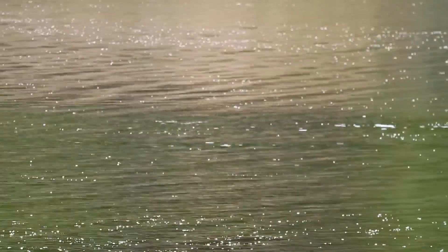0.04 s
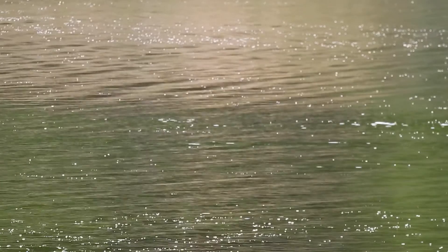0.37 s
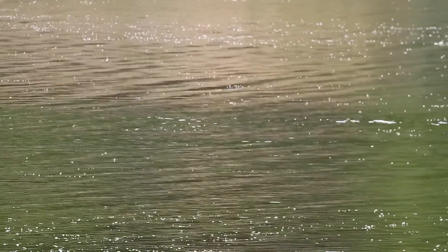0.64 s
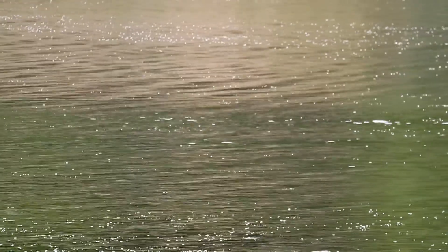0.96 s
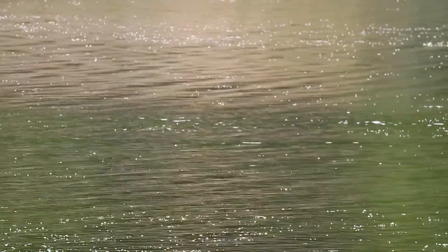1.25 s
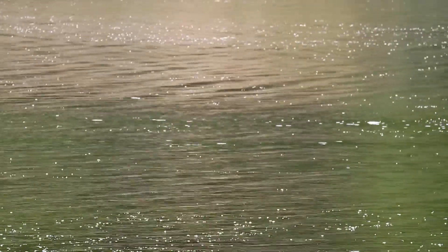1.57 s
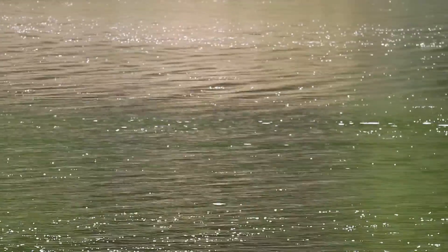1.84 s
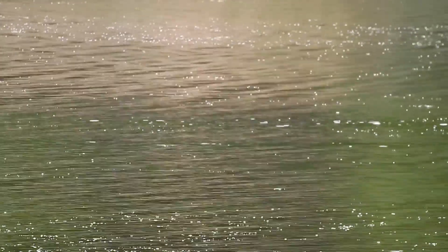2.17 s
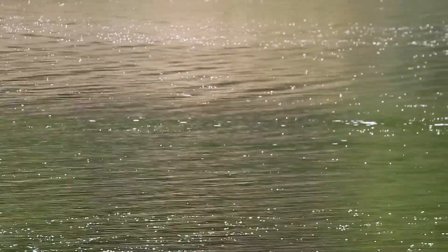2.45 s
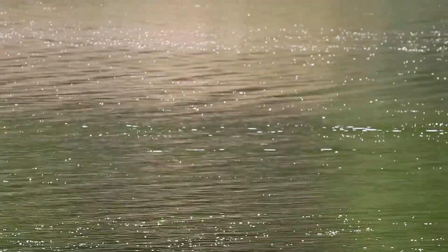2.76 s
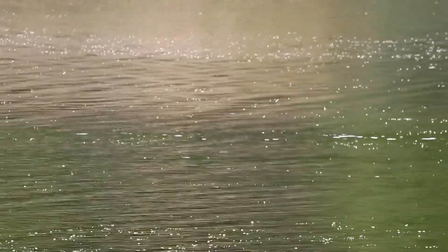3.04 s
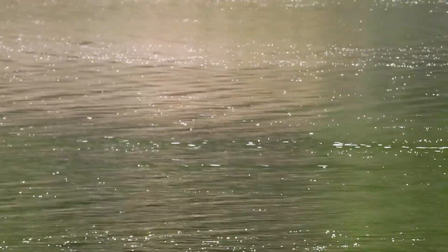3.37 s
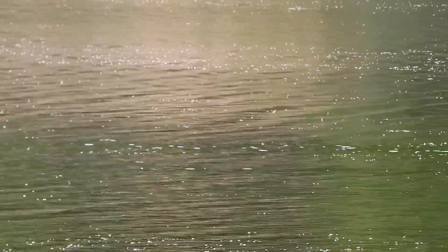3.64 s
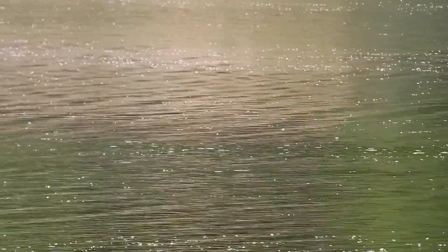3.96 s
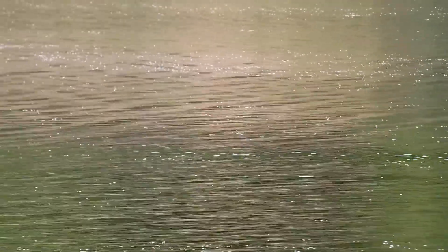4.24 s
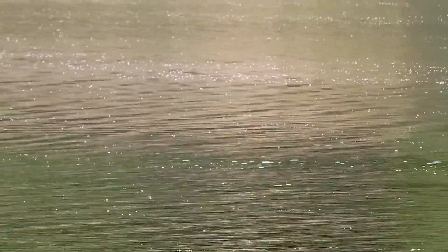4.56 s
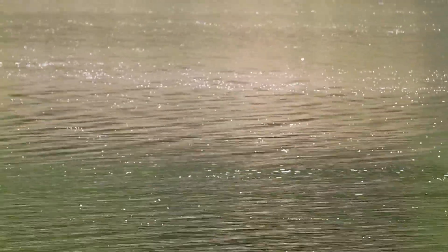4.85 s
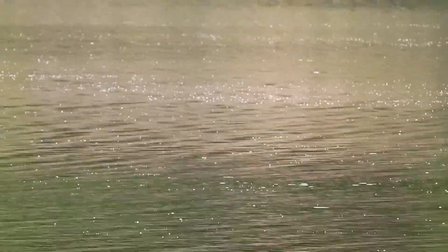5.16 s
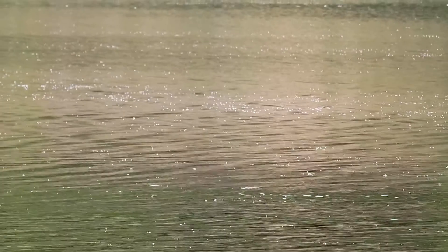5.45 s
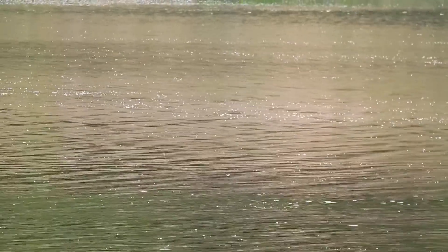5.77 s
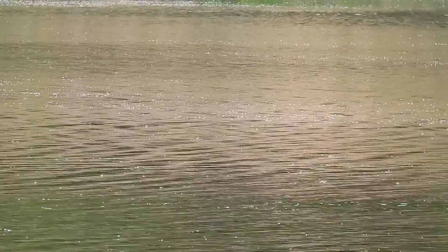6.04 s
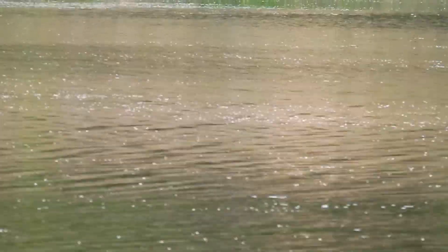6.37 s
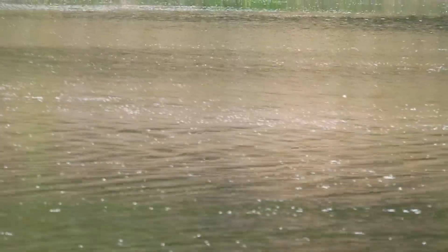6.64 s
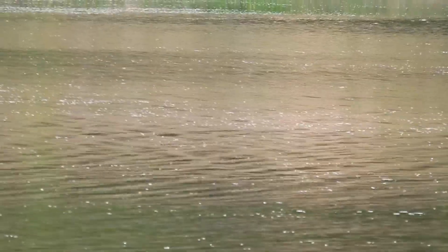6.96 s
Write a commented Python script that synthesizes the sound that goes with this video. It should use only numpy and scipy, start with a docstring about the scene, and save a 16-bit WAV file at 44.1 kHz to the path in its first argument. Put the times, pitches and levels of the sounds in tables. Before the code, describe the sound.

A small bird gives short, high chirps again and again beside a river, while a second whistles faintly farther off. Low wind buffeting on the microphone is the loudest sound at first, with a few light ticks, and it fades about halfway through. Underneath, a far engine hums and throbs steadily, the water flows with a gentle wash that slowly grows, and crickets trill faintly. There is a light echo from the trees.

```python
"""Wind thumps and rumbles on the two microphone ports, each on its own, for about three seconds.
Through it and after it, a small bird repeats arched, slurred chirps that echo in the trees
on a river bank; a second bird whistles farther off. The river washes along with tiny ringing
bubbles, a far motor drones and throbs as it fires, and crickets trill with their wings."""
import sys
import numpy as np
from scipy import signal
from scipy.fft import rfft, irfft
from scipy.io import wavfile
from scipy.ndimage import uniform_filter1d

SR = 44100
rng = np.random.default_rng(int(sys.argv[2]) if len(sys.argv) > 2 else 0)


def digitize_waveform(pressure):
    """Quantize a signal to 16-bit integers and store it at the path in sys.argv[1].

    Rows of a 2-D input are taken as channels; values are limited to [-1, 1].
    """
    field = np.atleast_2d(pressure).T
    bounded = np.clip(field, -1, 1)
    quanta = np.round(bounded * 32767).astype(np.int16)
    wavfile.write(sys.argv[1], SR, quanta)


N = 313110
TIME = np.arange(N) / SR
HZ = np.fft.rfftfreq(N, 1 / SR)

# Levels in the tables are relative: the functions add their own gains.
# The bird's notes, a high arch often followed by a lower note: t/s, length/s, time to crest/s,
# first f/Hz, crest f/Hz, last f/Hz, hold (1 slides evenly, 3 stays up and then drops),
# crest level/dB, change by the end/dB, rasp (share of the pitch)
BIRD_NOTES = [ (0, 0.1, .01, 3940, 3940, 3370, 1.15, -54, 2, .01),
              (.772, 0.067, .016, 4620, 5070, 4340, 1.05, -39, -7, 0.016),
              (.915, 0.1, 0.011, 4000, 4050, 3700, 1.3, -53, -1, .045),
              (1.512, 0.059, .021, 4960, 5300, 4480, 1.65, -45, 6, .04),
              (1.57, 0.036, 0.016, 4430, 4520, 4450, 1.5, -42, -1, 0.024),
              (1.645, 0.051, 0.014, 4360, 4580, 3670, 1.3, -42.5, -5, .03),
              (2.187, 0.063, 0.035, 4370, 5450, 4800, 2.5, -42, -3, 0.03),
              (2.247, 0.07, 0.0055, 4700, 4680, 3980, 1, -47, 2, 0.044),
              (2.326, 0.032, .007, 4500, 4740, 4280, 1.2, -44.5, -2, 0.029),
              (2.857, 0.069, .043, 4330, 5220, 4850, 2.2, -44.5, -7, 0.032),
              (3.003, 0.021, .011, 4370, 4540, 4280, 1.5, -38, -10, .03),
              (3.502, 0.093, 0.048, 4250, 5430, 3930, 2.63, -42.5, 1, 0.039),
              (3.647, .066, 0.0057, 4700, 4940, 4310, 1.3, -46, -6, 0.043),
              (4.168, 0.12, 0.032, 4560, 5160, 4970, 2.1, -45, -4, 0.041),
              (4.348, 0.043, .008, 4500, 4540, 3900, 1.7, -47, -2, .04),
              (4.783, .058, .03, 4500, 5240, 5230, 2, -49, -1, .035),
              (4.837, 0.15, .012, 5100, 5170, 4920, 1.6, -42, -4, 0.017),
              (5.323, .18, .04, 4700, 5420, 5070, 1.33, -48, 0, .022),
              (5.505, 0.11, 0.0056, 3880, 3870, 3300, 0.42, -50, -2, 0.026),
              (5.952, .108, 0.029, 4630, 5160, 4260, 2.6, -44, -13, .04),
              (6.051, .112, .035, 4350, 4340, 3830, 3.4, -43.5, -6, 0.0087),
              (6.674, .1, 0.048, 4330, 5280, 4030, 2.1, -42.5, -2, .028),
              (6.779, 0.095, 0.0069, 4100, 4000, 3740, 2.5, -46.5, 8, 0.0085)]
# The farther bird's sliding notes: t/s, length/s, first f/Hz, last f/Hz, level/dB
FAR_BIRD_NOTES = [(.06, 0.059, 5700, 5500, -60), (1.615, .03, 6050, 6050, -55),
                  (2.08, 0.023, 5400, 5350, -51), (2.265, 0.065, 6650, 6200, -54),
                  (4.575, .025, 5300, 5450, -48)]
# How squarely the bird faces us: t/s, boost of direct over scattered sound/dB
BIRD_FACING = [(0, -3.5), (1.6, -1), (3.1, 1), (4.3, 0), (5.4, 3), (6.1, 1), (6.8, 1)]
# Echoes from the bank and trunks: delay/s, level/dB, pan (-1 left, 1 right)
BANK_ECHOES = [(.005, -20.5, -0.21), (0.012, -15.5, 0.5), (.034, -16, -0.22)]
# Gusts on the microphone: t/s, length/s, left level/dB, right level/dB
WIND_GUSTS = [(0.061, 0.071, -25.5, -18.5), (.16, .07, -27, -21.5), (.255, 0.095, -29, -13.5),
              (0.367, 0.058, -30, -20.5), (.69, 0.017, -29, -42), (0.813, 0.045, -33, -23.5),
              (1.087, 0.015, -35, -19.5), (1.43, 0.23, -34, -30), (1.873, .11, -26.5, -34),
              (2.06, 0.13, -22, -39), (2.335, 0.07, -16.5, -38), (2.488, 0.19, -15, -33),
              (2.719, 0.036, -19, -21), (2.827, .03, -24.5, -36), (3.204, 0.024, -38, -30.5),
              (3.666, 0.013, -30, -44)]
# The tone of wind on the ports: f/Hz, level/dB
WIND_SPECTRUM = [(10, -38), (25, -33), (45, -2.5), (70, 2.5), (115, 8.5), (175, -1.5), (230, -13),
                 (330, -27), (500, -43), (900, -47), (4000, -110)]
# Light air between the gusts: t/s, level/dB
BREEZE_LEVEL = [(0, -34), (.6, -36), (2.2, -35), (3.5, -38.5), (4.4, -52.5), (7.1, -62)]
# Eddies (swirls of air) breaking on a port: t/s, level/dB, f/Hz, port (0 left, 1 right)
EDDY_THUMPS = [(0.1, -13, 247, 1), (0.198, -6.5, 158, 1), (0.279, -6, 129, 1), (0.4, -11.5, 193, 1),
               (0.817, -10, 126, 1), (.858, -12.5, 149, 1), (1.099, -18, 219, 1), (2.305, -9.5, 198, 0),
               (2.344, -4, 161, 0), (2.473, -5, 100, 0), (2.572, -4.5, 153, 0), (2.664, -12, 261, 0),
               (2.838, -11.5, 141, 0)]
# The tone of the river's wash: f/Hz, level/dB
RIVER_SPECTRUM = [(100, 6), (350, 4), (520, 2), (680, 3), (900, 1.5), (1500, 0), (2100, -2.5), (3300, -2.5),
                  (4500, -2.5), (6400, -0.2), (7300, -3), (7800, -11), (8300, -12), (10000, -20.5),
                  (13000, -29)]
# Small waves at the bank: t/s, level/dB, half length/s, centre f/Hz, width/Hz
WAVE_LAPS = [(1.25, -55.5, 0.19, 503, 70.5), (3.446, -55, 0.086, 1520, 60), (6.5, -58, 0.041, 1386, 140.3),
             (6.93, -51.5, .12, 1370, 200)]
# The motor's loudness: t/s, level/dB
MOTOR_LEVEL = [(0, -37.5), (3.6, -35.5), (4.7, -36.5), (5.3, -34), (7.1, -32.7)]
# The tone of its dull roar: f/Hz, level/dB
MOTOR_SPECTRUM = [(20, -53), (35, -40), (55, -2), (90, -1), (120, 4.5), (160, -2), (220, -11.5), (300, -17),
                  (400, -17), (520, -20.5), (650, -42.5), (1200, -39), (5000, -100)]
# Its humming tones: multiple of the firing rate, level/dB
MOTOR_HARMONICS = [(4, 0.5), (5, 1), (6, -4.5), (8, -14.5), (11, -13), (12, -30.5), (15, -17.5), (16, -23)]
# Its hollow note: t/s, centre f/Hz, level/dB
MOTOR_HOLLOW = [(0, 361, -55.5), (1.3, 361, -53.5), (2.5, 365, -48), (3.5, 368, -51), (4.9, 370, -48.5),
                (5.1, 368, -58), (6, 348, -49.5), (7.1, 343, -53)]
# The whole cricket chorus: t/s, middle f/Hz, level/dB
CHORUS_TRILL = [(0, 7625, -49.5), (1.6, 7600, -50), (2.1, 7750, -51.5), (3.2, 7620, -47.5),
                (4.4, 7610, -50), (7.1, 7600, -49)]
# Single crickets: pitch offset/Hz, level/dB, wing stroke rate/Hz
CRICKET_VOICES = [(-115, -2, 52), (-45.5, -4.5, 80), (11.5, -3.5, 75), (69, -1.5, 56), (125, -12, 55)]
# Ticks and drips nearby: t/s, level/dB, centre f/Hz, width/octaves, decay/s
NEAR_TICKS = [(.281, -52, 12000, .4, .0022), (1.062, -46.5, 7800, .067, .012), (1.616, -49, 7000, .6, .002),
              (1.93, -36, 2400, 0.75, .0043), (1.948, -41, 6500, 0.28, .0068),
              (2.129, -40, 6800, .25, .0044), (2.555, -43, 6200, .1, 0.0061), (2.777, -44, 6240, .2, .003),
              (6.89, -45, 7840, .08, .012)]
# How alike far noise is in both ears: f/Hz, likeness (0 unrelated, 1 the same)
EAR_LIKENESS = [(60, 0.94), (140, 1), (350, 0.88), (800, 0.82), (2000, 0.66), (3500, 0.75), (5000, 0.47),
                (6500, 0.29), (8500, 0.0022), (15000, 0.14)]


def birds(direct_db=-3.5, leaves_db=-8, grove_db=-5, grove_hz=4900, lingering_db=-51):
    """Both birds and their echoes: near branches blur the notes, and the grove rings with high ones."""
    song = np.zeros(N)
    for start, *note in BIRD_NOTES:
        add(song, start, chirp(*note))
    for start, length, first_hz, last_hz, db in FAR_BIRD_NOTES:
        add(song, start, whistle(np.linspace(first_hz, last_hz, round(length * SR)), db, rasp=0.015))
    facing = gain_of(follow(BIRD_FACING)[0] / 2)
    direct, aside = song * facing, song / facing
    out = gain_of(direct_db) * np.array([direct, direct])
    for delay, db, pan in BANK_ECHOES:
        add(out[0], delay, gain_of(db) * (1 - pan) * aside)
        add(out[1], delay, gain_of(db) * (1 + pan) * aside)
    out += gain_of(leaves_db) * tree_echo(aside, fade_s=0.2, build_s=0.004)
    # a chirp is already ringing in the trees at the start
    out += gain_of(lingering_db - 60 * TIME / 0.9) * narrow_noise(4180, width_hz=99)
    high_notes = signal.lfilter(*signal.iirpeak(grove_hz, Q=5, fs=SR), aside)
    return out + gain_of(grove_db) * tree_echo(high_notes, fade_s=0.77, build_s=0.045)


def chirp(length, crest_s, first_hz, crest_hz, last_hz, hold, db, fade_db, rasp, scoop_db=-3):
    """One arch: the pitch scoops up to its crest, holds and slides down."""
    t = np.arange(0, length, 1 / SR)
    scoop = np.clip(1 - t / crest_s, 0, 1) ** 2
    fall = np.clip((t - crest_s) / (length - crest_s), 0, 1) ** hold
    hz = crest_hz + (first_hz - crest_hz) * scoop + (last_hz - crest_hz) * fall
    level = db + scoop_db * scoop + fade_db * fall
    # on high notes the other side of the bird's voice box joins in, lower and weaker, adding a burr
    joined = np.interp(hz, [4100, 4900], [0, 1])
    return whistle(hz, level, rasp) + joined * whistle(hz - 300, level - 6, rasp)


def whistle(hz, db, rasp, tremble_db=3.6, attack_s=0.006, release_s=0.005):
    """A nearly pure tone along the pitch curve hz; quick pitch dips and a tremble make it rasp."""
    t = np.arange(len(hz)) / SR
    steps = t[::110]
    quiver = np.interp(t, steps, rng.standard_normal(len(steps)))
    tremble = np.interp(t, steps, rng.standard_normal(len(steps)))
    tone = np.sin(phase_of(hz * (1 + rasp * np.minimum(quiver, 0))))
    edges = np.clip(np.minimum(t / attack_s, (t[-1] - t) / release_s), 0, 1)
    return np.sqrt(2) * gain_of(db + tremble_db * tremble) * tone * edges


def wind(rise_s=0.022, fall_s=0.028, eddy_db=1.86, eddy_rate_hz=7.8, breeze_cutoff_hz=150):
    """Gusts shake each port with its own eddies; light air makes only the deepest rumble."""
    t = TIME[::64]
    power = np.zeros((2, len(t)))
    for start, length, left_db, right_db in WIND_GUSTS:
        # a gust builds up just before its start and dies away after its length
        outside = np.maximum(start - t, 0) / rise_s + np.maximum(t - start - length, 0) / fall_s
        power += (gain_of([[left_db], [right_db]]) * np.exp(-np.minimum(outside, 20))) ** 2
    colour = gain_of(at_frequency(WIND_SPECTRUM, HZ))
    ports = []
    for force in np.sqrt(power):
        swirl = shaped_noise(colour)
        # even out the noise so that gusts and eddies set its strength
        swirl /= np.sqrt(uniform_filter1d(swirl ** 2, size=1300) + 0.016)
        breeze = shaped_noise(colour / (1 + (HZ / breeze_cutoff_hz) ** 2))
        strength = gain_of(eddy_db * wander(eddy_rate_hz)) * np.interp(TIME, t, force)
        ports.append(strength * swirl + gain_of(follow(BREEZE_LEVEL)[0]) * breeze)
    return np.array(ports)


def thumps(level_db=-2, width_cycles=0.52):
    """A breaking eddy shoves the microphone's membrane once, and it swings straight back."""
    out, t = np.zeros((2, N)), np.arange(-700, 700) / SR
    for when, db, hz, port in EDDY_THUMPS:
        push = np.sin(2 * np.pi * hz * t) * np.exp(-(hz * t / width_cycles) ** 2)
        add(out[int(port)], when + t[0], gain_of(db + level_db) * push)
    return out


def river(wash_db=4.5, bubbles_db=-18, spread_db=12, count=600, flow_db=-52.5, growth_db_per_s=0.9551):
    """A slowly swelling wash of far ripples, with small bubbles that rise in pitch as they ring."""
    t, bubbles = np.arange(SR // 25) / SR, np.zeros((2, N))
    for when, smallness, loudness, side in rng.random((count, 4)):
        hz = 700 * 9 ** smallness
        rising_tone = np.sin(2 * np.pi * hz * t * (1 + 2 * t))
        ring = gain_of(spread_db * loudness ** 2) * rising_tone * np.exp(-hz * t / 7)
        add(bubbles[0], when * N / SR, (2 - side) * ring)
        add(bubbles[1], when * N / SR, (1 + side) * ring)
    wash = gain_of(wash_db) * far_noise(RIVER_SPECTRUM, patchy_db=1.62)
    water = wash + gain_of(bubbles_db) * unit_level(bubbles)
    return gain_of(flow_db + growth_db_per_s * TIME) * water


def laps():
    """Small waves gurgle softly against the bank, each swelling and fading."""
    return sum(gain_of(db) * np.exp(-((TIME - when) / half_s) ** 2) * narrow_noise(hz, width_hz)
               for when, db, half_s, hz, width_hz in WAVE_LAPS)


def motor(firing_hz=24.13, waver=0.00832, throb=0.34, hum_db=-5, fading_db=1, left_db=-1.9):
    """A far engine: a roar that throbs with each firing, a wavering hum and a hollow note."""
    firing = phase_of(firing_hz * (1 + waver * wander(2.19)))
    hum = sum(gain_of(db + fading_db * wander(1.4)) * np.cos(multiple * firing + wander(1))
              for multiple, db in MOTOR_HARMONICS)
    roar = far_noise(MOTOR_SPECTRUM, patchy_db=1) * (1 + throb * np.cos(firing))
    drone = gain_of(follow(MOTOR_LEVEL)[0]) * (roar + gain_of(hum_db) * unit_level(hum))
    hollow_hz, hollow_db = follow(MOTOR_HOLLOW)
    hollow = gain_of(hollow_db) * narrow_noise(hollow_hz, width_hz=50)
    return drone * gain_of([[left_db], [0]]) + hollow


def crickets(level_db=-1, drift_hz=29, throb=0.16, throb_hz=11, echo_db=-1):
    """Each cricket's wing strokes ring near one pitch; the chorus throbs and blurs among the trees."""
    middle_hz, db = follow(CHORUS_TRILL)
    chorus = np.zeros(N)
    for offset_hz, own_db, stroke_hz in CRICKET_VOICES:
        strokes = 1 + 0.78 * np.cos(phase_of(stroke_hz * (1 + 0.0595 * wander(7.63))))
        ring = np.sin(phase_of(middle_hz + offset_hz + drift_hz * wander(25.04)))
        chorus += gain_of(own_db) * strokes * ring
    chorus *= 1 + throb * np.sin(phase_of(throb_hz + wander(3.1)))
    echo = gain_of(echo_db) * tree_echo(chorus, fade_s=0.48, build_s=0.0088)
    return gain_of(db + level_db) * unit_level(chorus + echo)


def ticks(level_db=-3, attack_s=0.00027):
    """Ticks and drips: brief bursts of noise, each in its own band, that die at once."""
    out, t = np.zeros(N), np.arange(2048) / SR
    hz = np.fft.rfftfreq(len(t), 1 / SR)
    for start, db, centre_hz, octaves, decay_s in NEAR_TICKS:
        band = np.exp(-0.5 * (np.log2((hz + 1) / centre_hz) / octaves) ** 2)
        envelope = np.exp(-t / decay_s) * (1 - np.exp(-t / attack_s))
        add(out, start, gain_of(db + level_db) * shaped_noise(band, len(t)) * envelope)
    return out


def tree_echo(sound, fade_s, build_s):
    """Trees scatter a sound into a tail, different at each ear, that drops 60 dB in fade_s."""
    t = np.arange(SR) / SR
    tail = rng.standard_normal((2, SR)) * gain_of(-60 * t / fade_s) * (1 - np.exp(-t / build_s))
    return signal.fftconvolve(sound[None], tail / np.linalg.norm(tail[0]), axes=1)[:, :N]


def far_noise(spectrum, patchy_db):
    """Stereo noise from afar, alike in both ears in the bass, with passing brighter patches."""
    hz = np.fft.rfftfreq(2048, 1 / SR)
    mid_re, mid_im, side_re, side_im, patches = rng.standard_normal((5, N // 512 + 5, len(hz)))
    patches = uniform_filter1d(patches, size=7, axis=0)  # smooth over time
    patches = unit_level(uniform_filter1d(patches, size=18, axis=1))  # and over frequency
    likeness = at_frequency(EAR_LIKENESS, hz)
    mid = np.sqrt(1 + likeness) * (mid_re + 1j * mid_im)
    side = np.sqrt(1 - likeness) * (side_re + 1j * side_im)
    colour = gain_of(at_frequency(spectrum, hz) + patchy_db * patches)
    frames = np.array([mid + side, mid - side]) * colour
    _, sound = signal.istft(frames.swapaxes(1, 2), nperseg=2048, noverlap=1536)
    return unit_level(sound[:, :N])


def narrow_noise(hz, width_hz):
    """A narrow band of noise around hz, which may move."""
    phase = phase_of(hz * np.ones(N))
    return wander(width_hz) * np.cos(phase) + wander(width_hz) * np.sin(phase)


def shaped_noise(colour, samples=N):
    """Noise whose frequencies are weighted by colour, scaled to level 1."""
    return unit_level(irfft(rfft(rng.standard_normal(samples)) * colour, samples))


def wander(rate_hz):
    """A smooth random curve that changes up to about rate_hz times a second."""
    t = np.arange(16384) / 2048
    keep_slow = np.exp(-(np.fft.rfftfreq(len(t), t[1]) / rate_hz) ** 2)
    return np.interp(TIME, t, shaped_noise(keep_slow, len(t)))


def phase_of(hz):
    """The running angle of a wave whose frequency follows hz."""
    return 2 * np.pi * np.cumsum(hz) / SR


def gain_of(db):
    """Turns decibels into a gain."""
    return 10 ** (np.asarray(db) / 20)


def unit_level(x):
    """Scales a signal to an average (rms) level of 1."""
    return x / np.sqrt(np.mean(x ** 2) + 1e-20)


def at_frequency(table, hz):
    """Looks up a table at hz, on a scale of octaves."""
    f, value = np.transpose(table)
    return np.interp(np.log(hz + 1), np.log(f + 1), value)


def follow(table):
    """Joins a table's points in time into one curve for each value column."""
    times, *columns = np.transpose(table)
    return [np.interp(TIME, times, column) for column in columns]


def add(mix, start_s, sound):
    """Mixes a sound in at start_s."""
    part = mix[max(round(start_s * SR), 0):][:len(sound)]
    part += sound[:len(part)]


def scene():
    """Everything heard on the bank."""
    return birds() + river() + laps() + motor() + crickets() + wind() + thumps() + ticks()


def record(dry, hiss_db=-71, cutoff_hz=15800):
    """Adds faint microphone hiss, then cuts off the highest treble."""
    hissy = dry + gain_of(hiss_db) * rng.standard_normal((2, N))
    lowpass = signal.firwin(511, cutoff_hz, window=("kaiser", 9), fs=SR)
    return signal.oaconvolve(hissy, lowpass[None], "same")


dry = scene()
out = record(dry)
digitize_waveform(out)
```